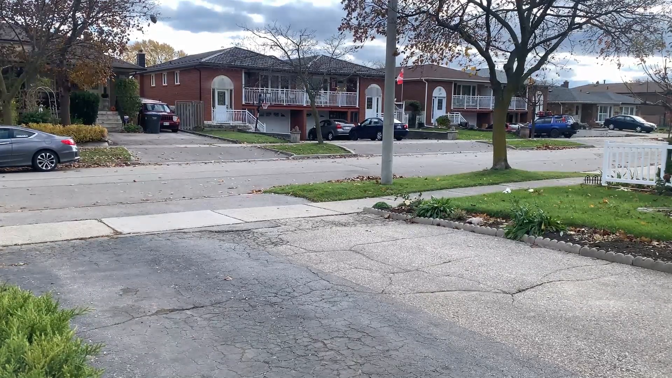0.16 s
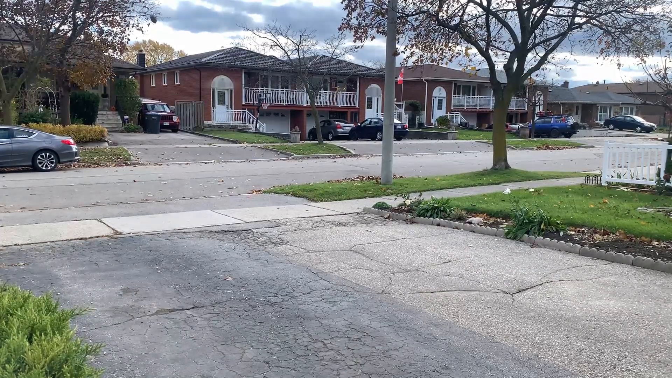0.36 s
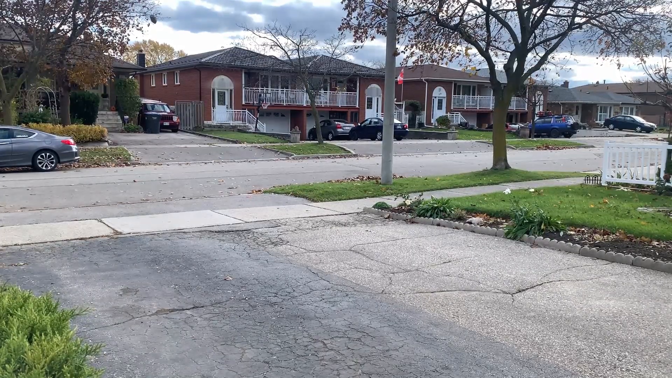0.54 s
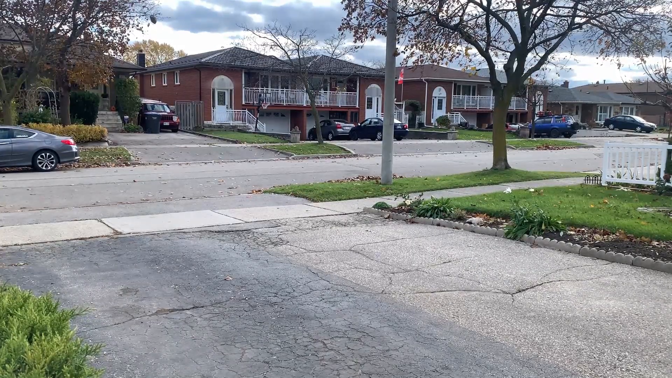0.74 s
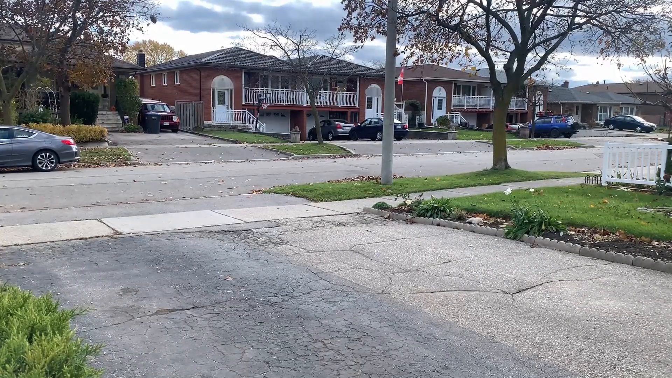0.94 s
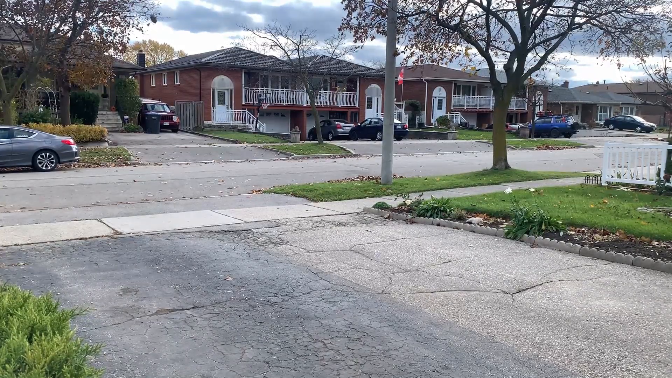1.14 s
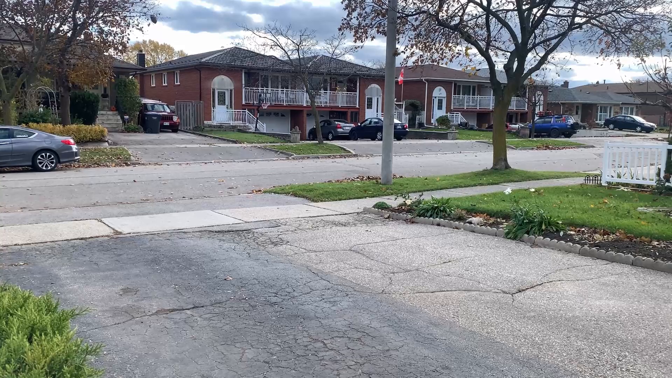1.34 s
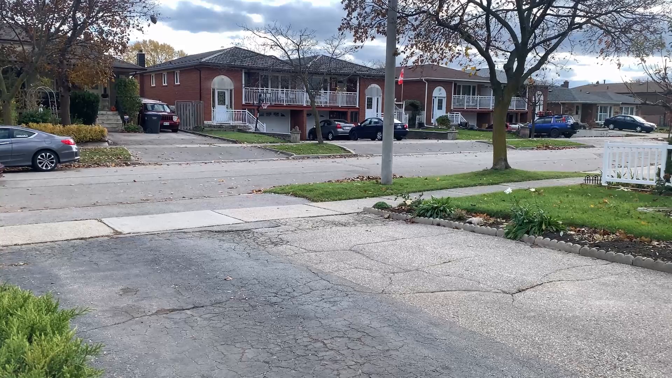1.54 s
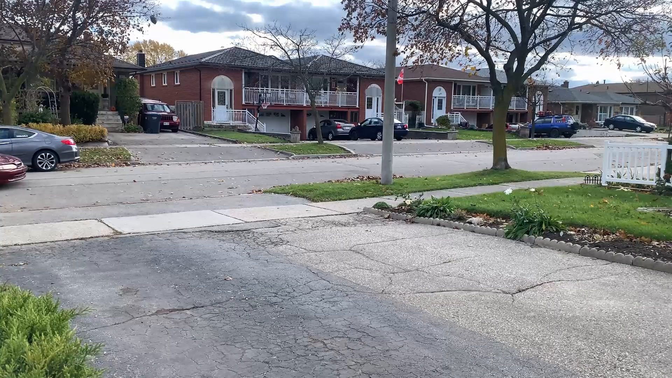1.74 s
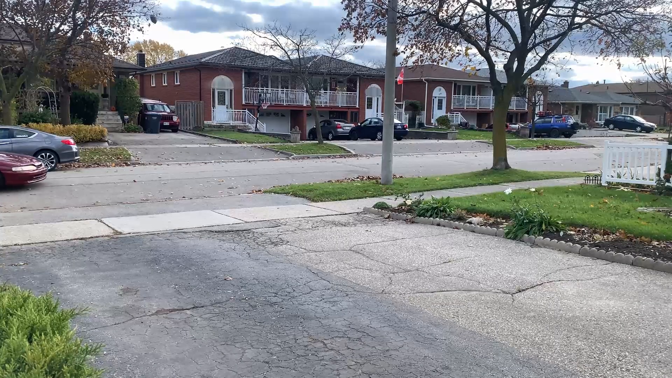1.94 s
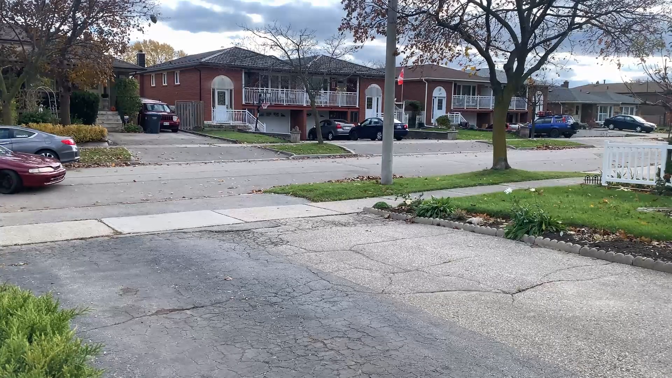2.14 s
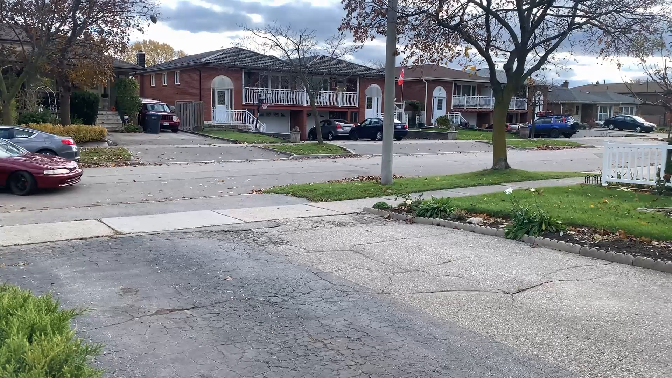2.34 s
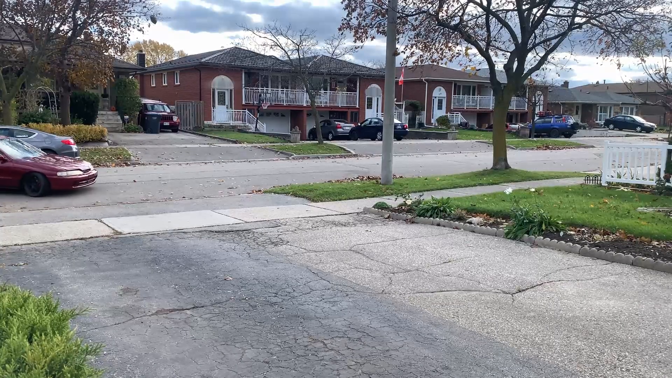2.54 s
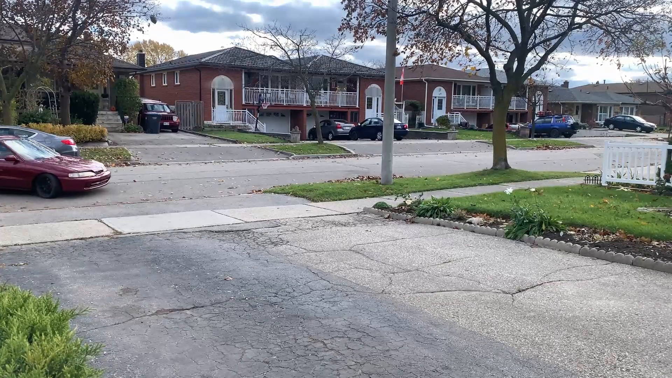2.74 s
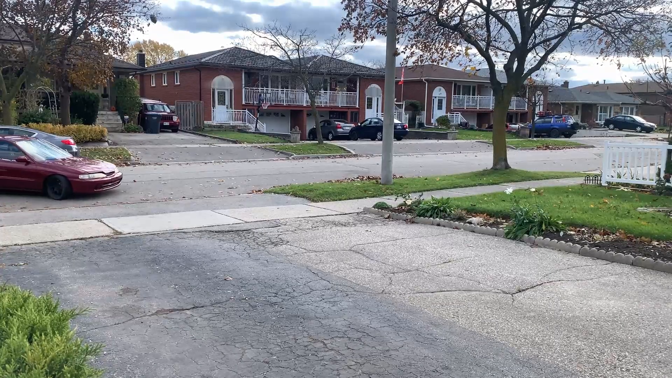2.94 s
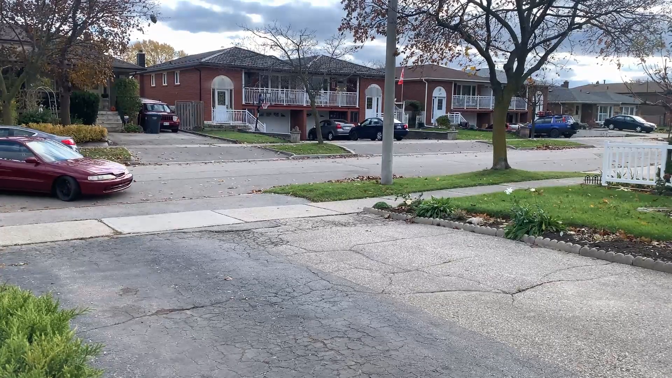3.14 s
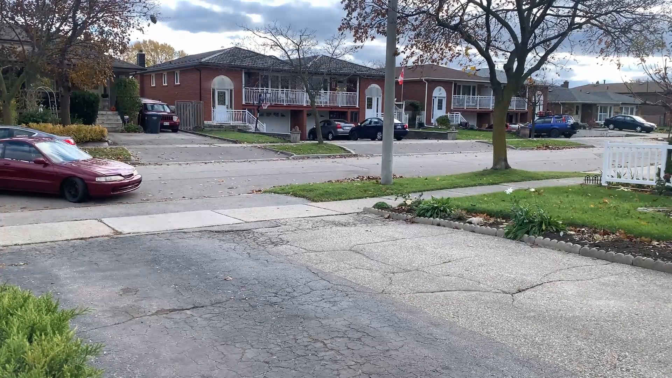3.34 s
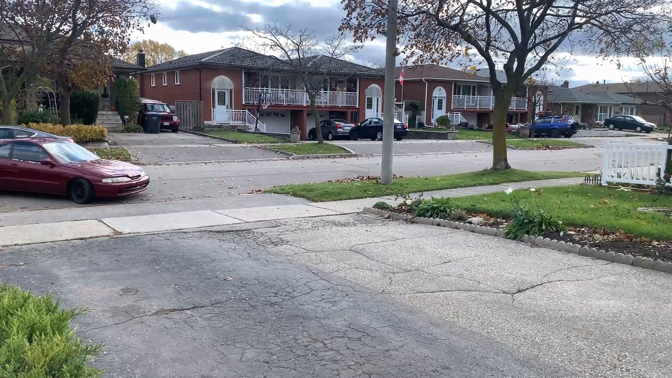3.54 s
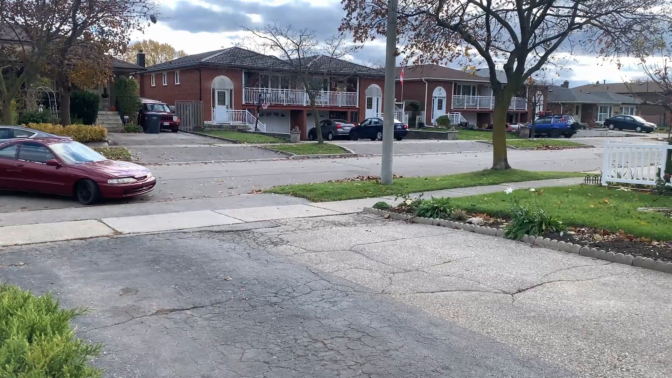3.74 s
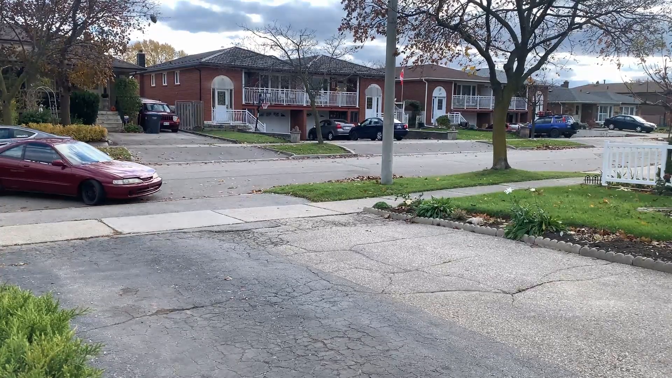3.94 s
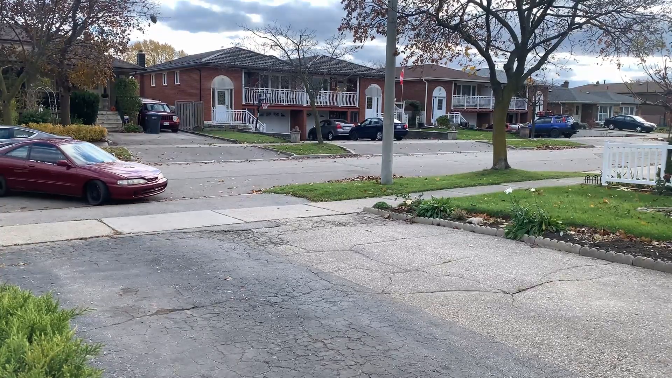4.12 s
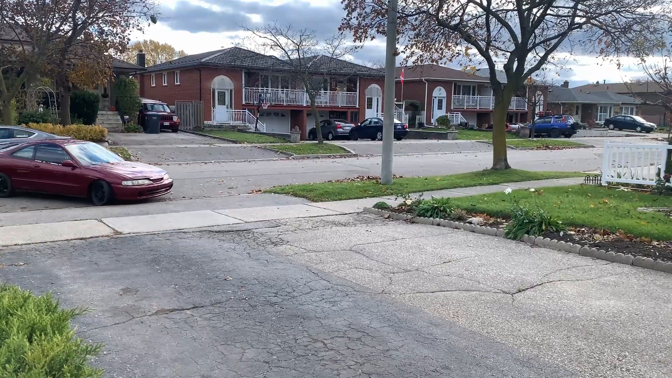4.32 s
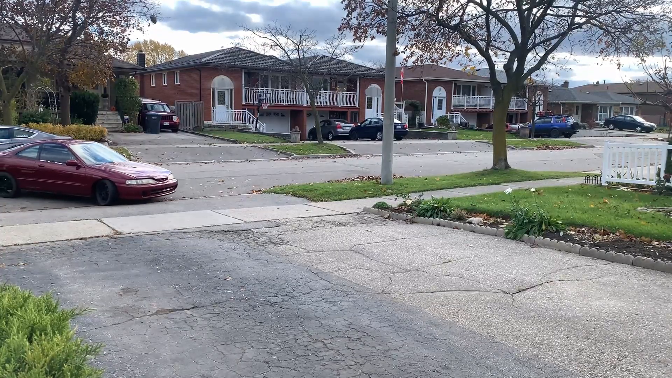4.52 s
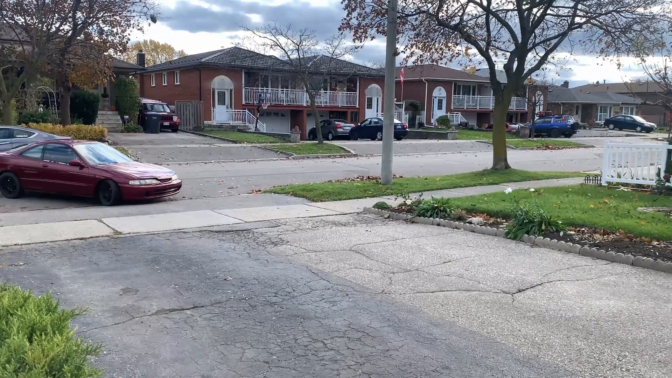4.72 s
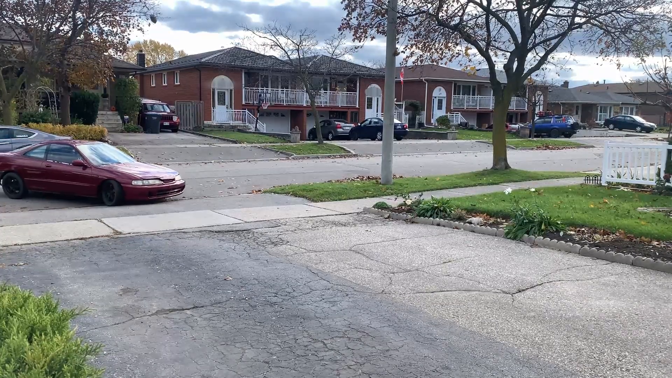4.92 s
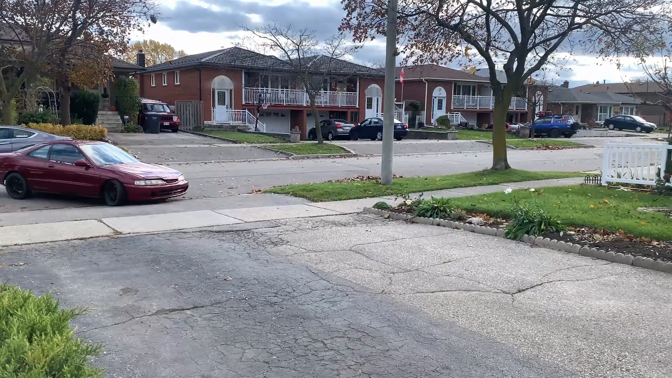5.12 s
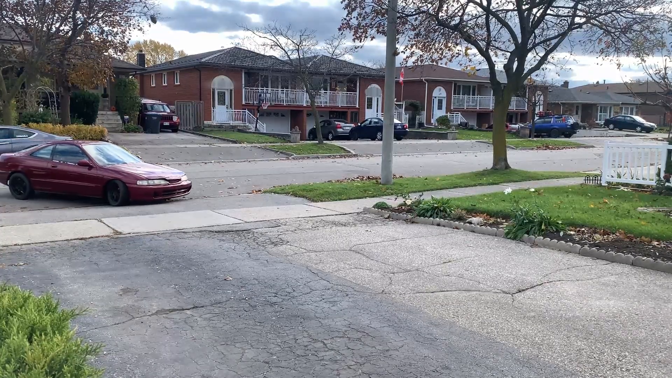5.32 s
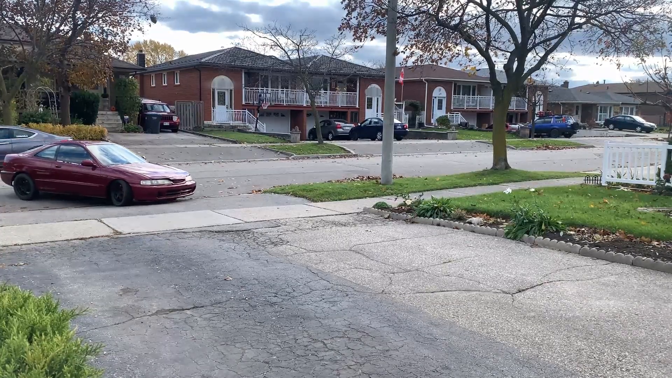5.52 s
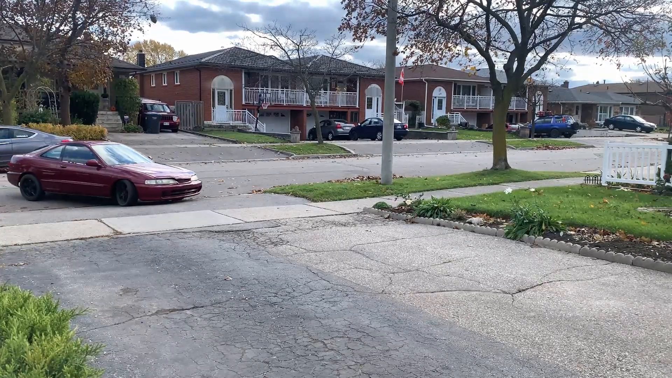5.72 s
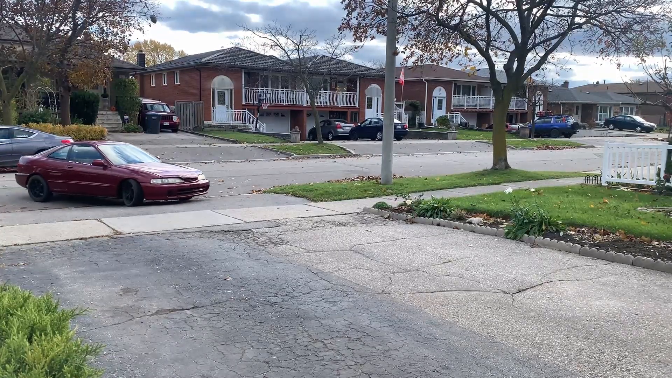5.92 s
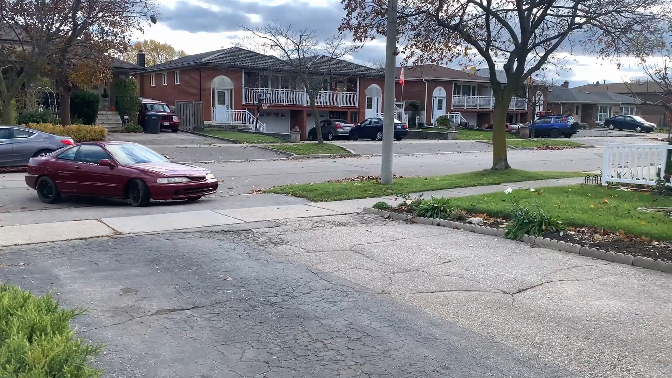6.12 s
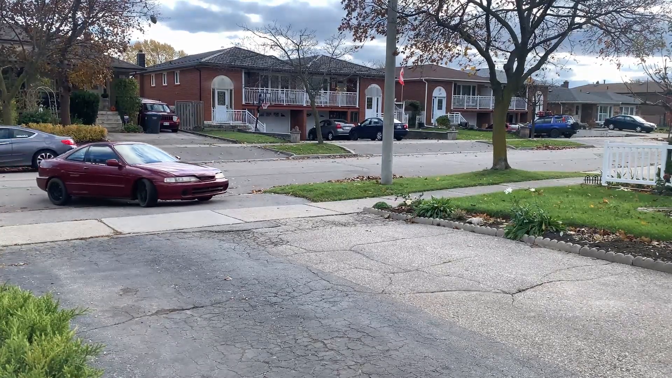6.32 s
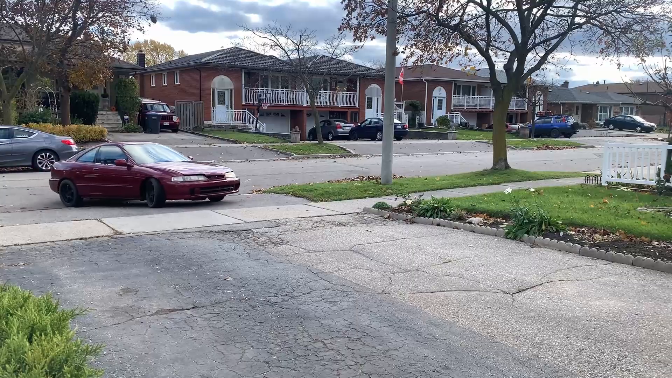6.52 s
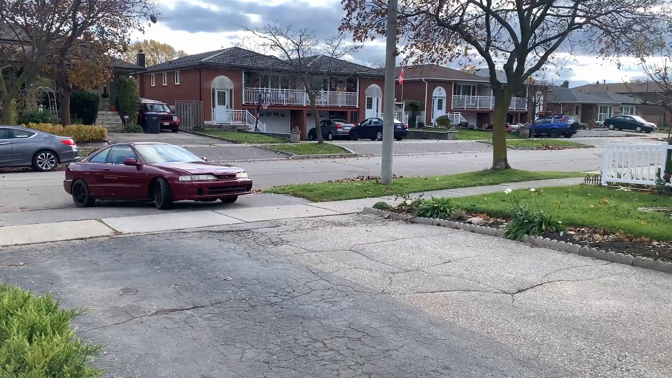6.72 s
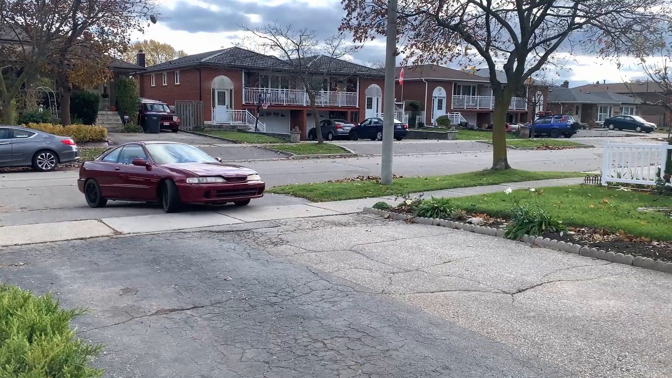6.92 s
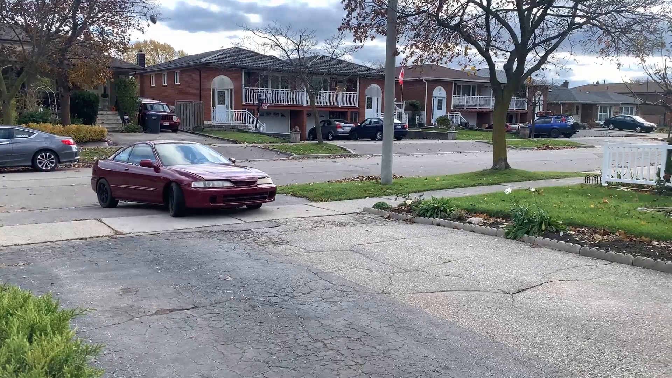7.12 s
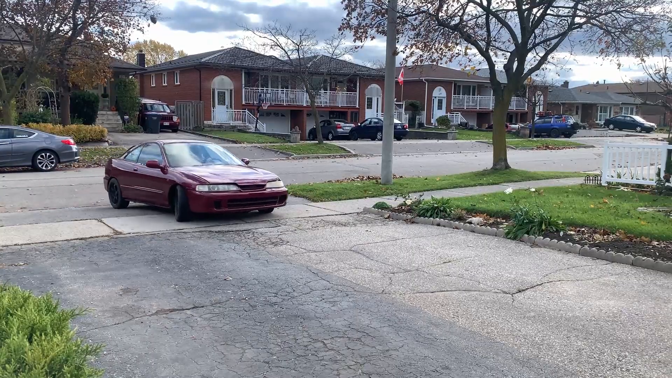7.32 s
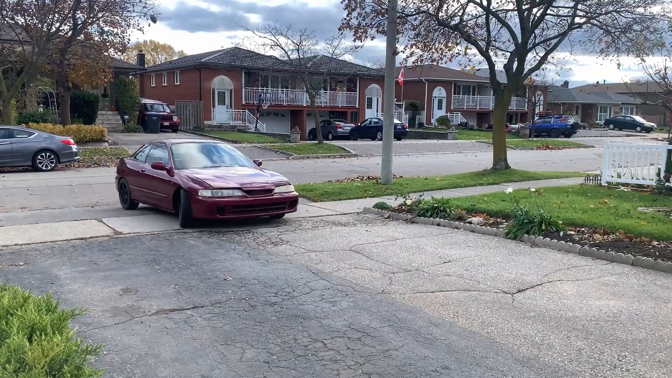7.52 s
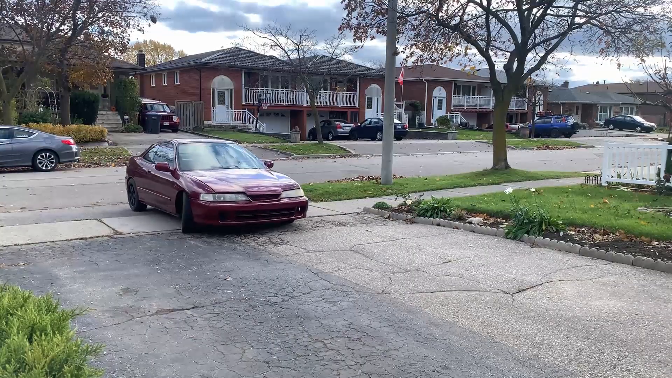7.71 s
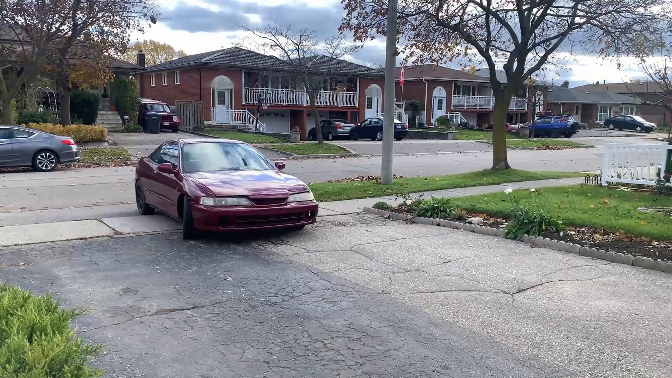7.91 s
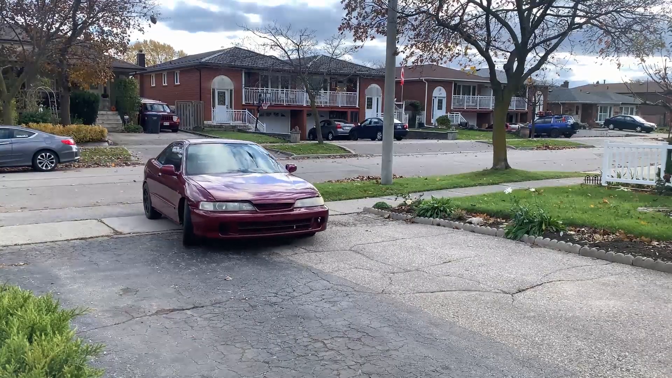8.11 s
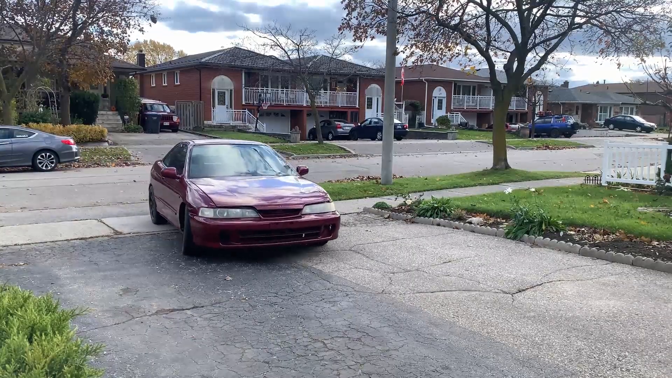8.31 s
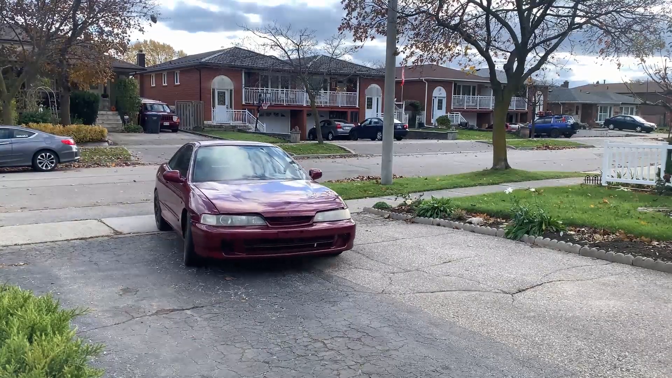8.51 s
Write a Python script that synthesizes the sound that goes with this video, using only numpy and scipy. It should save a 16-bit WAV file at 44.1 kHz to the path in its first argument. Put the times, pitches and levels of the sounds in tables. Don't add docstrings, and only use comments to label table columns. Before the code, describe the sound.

A phone outdoors on a quiet residential street hears a small four-cylinder car with a loud exhaust. From 0 to 1 s a deep, booming drone slides down in pitch and fades, with a barely audible thin brake squeal. From about 1 to 4.4 s it is a much quieter, lumpy idle: soft burble, dry airy brake rubbing, little ticks and scattered dull pops in the pipe, one sharp, loud pop at 3.5 s. At 4.5 s the throttle gulps open with bright hissing bursts and the engine leaps to a high, raspy rev, held with slight wavering until 5.4 s. It falls to a low growl by 6 s, then climbs gently from 6.6 s into a strong, steady boomy drone with rasp and pulsing intake hiss, still sounding at 8.6 s as the car pulls in. House fronts reflect the exhaust; faint street noise lies beneath.

```python
import sys
import numpy as np
from scipy import signal
from scipy.fft import rfft, irfft, next_fast_len
from scipy.io import wavfile
from scipy.ndimage import uniform_filter1d, map_coordinates

SR = 44100
rng = np.random.default_rng(int(sys.argv[2]) if len(sys.argv) > 2 else 0)


def nominal_scale(level):
    x = np.asarray(level, float) / 20
    return 10 ** x


def waveform_to_disk(signal):
    frames = np.transpose(np.atleast_2d(signal))
    scaled = np.clip(frames, -1, 1) * 32767
    samples = np.round(scaled).astype(np.int16)
    wavfile.write(sys.argv[1], SR, samples)


N = 381906

# start_s, crank_turns_per_s, order_1_db, order_2_db (firing), order_3_db, order_4_db, rasp_db
EXHAUST_ORDERS = [(0.03, 51.0, -20, -12, -43, -43, -36), (0.05, 50.6, -21, -11, -41, -50, -37),
                  (0.19, 47.7, -25, -15, -39, -57, -34), (0.27, 46.4, -25, -22, -38, -44, -33),
                  (0.32, 45.7, -27, -10, -52, -41, -34), (0.39, 45.2, -26, -10, -38, -44, -33),
                  (0.44, 45.2, -29, -9, -50, -50, -33), (0.53, 42.9, -41, -7, -43, -42, -44),
                  (0.6, 41.6, -36, -10, -42, -37, -40), (0.7, 40.0, -34, -9, -40, -51, -43),
                  (0.77, 38.6, -36, -9, -39, -39, -45), (0.86, 36.0, -37, -11, -23, -51, -41),
                  (1.01, 32.6, -48, -23, -29, -44, -49), (1.3, 31.3, -46, -27, -31, -47, -45),
                  (1.39, 30.3, -42, -30, -27, -35, -40), (1.51, 29.1, -56, -36, -22, -40, -48),
                  (1.92, 23.6, -61, -44, -35, -39, -47), (2.23, 23.4, -67, -57, -31, -25, -48),
                  (2.3, 23.5, -65, -43, -33, -27, -45), (2.8, 27.1, -61, -36, -24, -38, -45),
                  (3.64, 26.6, -48, -37, -28, -34, -41), (3.79, 26.4, -58, -44, -20, -33, -45),
                  (3.93, 26.7, -52, -31, -26, -40, -46), (4.17, 25.9, -57, -45, -24, -36, -37),
                  (4.36, 23.9, -62, -33, -23, -21, -42), (4.41, 23.5, -62, -57, -30, -24, -43),
                  (4.46, 23.6, -53, -40, -25, -16, -40), (4.53, 26.7, -41, -29, -10, -20, -35),
                  (4.58, 30.9, -38, -15, -10, -21, -28), (4.62, 37.3, -31, -10, -27, -51, -22),
                  (4.65, 42.2, -30, -7, -27, -34, -23), (4.69, 51.0, -23, -8, -36, -32, -18),
                  (4.72, 54.5, -18, -13, -38, -28, -18), (4.74, 57.5, -16, -15, -29, -29, -20),
                  (4.79, 62.1, -15, -19, -36, -29, -17), (4.84, 64.6, -19, -35, -34, -40, -21),
                  (4.86, 65.8, -17, -38, -42, -45, -31), (4.93, 63.2, -13, -23, -39, -40, -24),
                  (5.01, 60.4, -20, -26, -39, -37, -29), (5.05, 60.1, -15, -26, -48, -36, -26),
                  (5.13, 62.2, -15, -22, -31, -31, -17), (5.2, 64.0, -18, -24, -43, -34, -24),
                  (5.27, 66.0, -15, -27, -29, -37, -22), (5.36, 68.1, -12, -28, -21, -31, -22),
                  (5.43, 65.6, -13, -25, -25, -32, -22), (5.53, 60.5, -21, -18, -29, -29, -16),
                  (5.58, 57.2, -16, -15, -31, -30, -25), (5.63, 53.7, -18, -12, -51, -28, -20),
                  (5.68, 50.3, -26, -10, -34, -45, -21), (5.75, 46.0, -27, -8, -30, -39, -27),
                  (5.92, 39.1, -35, -12, -35, -35, -31), (6.01, 35.7, -38, -10, -18, -34, -28),
                  (6.2, 34.4, -37, -14, -11, -40, -33), (6.32, 33.6, -38, -15, -11, -35, -32),
                  (6.49, 34.1, -38, -16, -11, -34, -34), (6.61, 36.4, -32, -11, -13, -29, -28),
                  (6.68, 38.1, -37, -8, -36, -32, -25), (6.77, 39.4, -32, -9, -28, -28, -27),
                  (6.94, 41.0, -33, -8, -32, -32, -27), (7.02, 41.7, -32, -10, -33, -53, -21),
                  (7.09, 42.1, -29, -10, -29, -31, -21), (7.14, 42.3, -28, -10, -28, -31, -17),
                  (7.35, 43.4, -31, -10, -30, -30, -18), (7.52, 44.2, -30, -8, -28, -53, -20),
                  (7.61, 44.5, -28, -9, -30, -39, -16), (7.66, 44.8, -30, -9, -30, -49, -19),
                  (7.9, 45.6, -34, -8, -26, -37, -23), (8.02, 44.5, -35, -8, -25, -54, -22),
                  (8.26, 44.6, -32, -7, -29, -39, -25), (8.38, 44.7, -31, -7, -27, -56, -21),
                  (8.4, 44.6, -34, -7, -27, -42, -24), (8.62, 44.7, -33, -7, -26, -45, -23)]
# start_s, roar_db, treble_db
BAY_LEVELS = [(0.03, -52, -56.5), (1.03, -58, -70), (1.08, -61, -53), (1.11, -58, -67.5),
              (1.15, -60.5, -66), (1.27, -55.5, -58.5), (1.68, -56, -56), (1.75, -55, -60),
              (1.99, -55, -58), (2.2, -52, -52), (3.16, -56.5, -64.5), (3.19, -53.5, -64),
              (3.21, -57, -58.5), (3.47, -56, -66), (3.5, -55, -69), (3.59, -55, -69), (3.62, -47, -61),
              (3.67, -58, -68.5), (4.12, -58, -72), (4.14, -60, -72), (4.17, -59, -68), (4.41, -56, -63.5),
              (4.43, -56.5, -66.5), (4.46, -51.5, -48.5), (4.58, -42, -34), (4.6, -32.5, -30.5),
              (4.69, -35.5, -34.5), (4.72, -33, -37), (4.74, -37, -39), (4.84, -40, -55.5),
              (4.91, -42.5, -62), (4.93, -44.5, -47.5), (4.98, -42.5, -55.5), (5.05, -45.5, -58),
              (5.25, -40.5, -51.5), (5.56, -42, -48), (5.72, -43.5, -50.5), (5.96, -43, -47),
              (5.98, -38, -46), (6.01, -45.5, -46), (6.08, -41, -44), (6.27, -40, -42.5),
              (6.65, -35, -37.5), (6.82, -35.5, -41), (7.04, -36, -43), (7.49, -40.5, -47),
              (7.93, -40, -50), (8.6, -38, -48.5), (8.62, -34, -49.5)]
# start_s, rough_share of rasp, hiss_pulse_depth, brake_share of treble
SHARES = [(0, .3, .2, 0), (.5, .4, .2, 0), (1.1, .85, .2, .1), (1.3, .9, .1, .8), (3.3, .9, .1, .8),
          (4.3, .9, .2, .5), (4.45, .8, .3, 0), (4.75, .4, .4, 0), (4.95, .4, .3, 0), (5.3, .15, .3, .15),
          (5.7, .35, .3, .15), (6, .6, .5, 0), (6.7, .6, .65, 0), (7, .2, .55, 0), (7.5, .1, .4, 0),
          (8.66, .1, .35, 0)]


def unit(x):
    return x / np.sqrt(np.mean(x ** 2) + 1e-20)


def along(points, hz):
    f, v = np.transpose(points)
    return np.interp(np.log(hz + 1), np.log(f + 1), v)


def curves(rows):
    s, *cols = np.transpose(rows)
    return [np.interp(np.arange(N) / SR, s, c) for c in cols]


def wobble(rate_hz):
    knots = rng.standard_normal(int(N * rate_hz / SR) + 4)
    return map_coordinates(knots, [np.arange(N) * rate_hz / SR], order=2)


def filtered(x, response):
    edge = 2048
    x = np.pad(x, [(0, 0)] * (x.ndim - 1) + [(edge, edge)], "reflect", reflect_type="odd")
    m = next_fast_len(N + SR // 2)
    spectrum = rfft(x, m) * response(np.fft.rfftfreq(m, 1 / SR))
    return irfft(spectrum, m)[..., edge:edge + N]


def ringing(modes, hz):
    total = 0
    for k, (centre_hz, width_hz, db) in enumerate(modes):
        damping = 1j * hz * width_hz
        total = total + (-1) ** k * nominal_scale(db) * damping / (centre_hz ** 2 - hz ** 2 + damping)
    return total


def rush(spectrum, patchy_db, modes=()):
    z = signal.stft(rng.standard_normal((2, N)), nperseg=512)[2]
    patches = uniform_filter1d(rng.standard_normal(z.shape[1:]), 5, 0)
    patches = unit(uniform_filter1d(patches, 8, 1))
    pair = signal.istft(z * nominal_scale(patchy_db * patches), nperseg=512)[1][:, :N]
    return unit(filtered(pair, lambda hz: np.hypot(nominal_scale(along(spectrum, hz)), np.abs(ringing(modes, hz)))))


def crank():
    return np.cumsum(curves(EXHAUST_ORDERS)[0]) / SR


def firings():
    at = np.flatnonzero(np.diff(np.floor(2 * crank())))
    train = np.zeros(N)
    train[at] = rng.uniform(-1.01, 1, N)[at]
    return train


def boom():
    # centre_hz, width_hz, level_db
    muffler = [(88.1, 47.2, 8), (52, 28, -2.5), (119, 50, -8)]
    # start_s, level_db
    burble_levels = [(0, -33.5), (.5, -33.5), (.8, -28), (1.1, -29), (1.6, -30.5), (2, -31.5), (2.6, -30),
                     (3.2, -26), (3.8, -28.5), (4.3, -25), (4.55, -15), (4.75, -18), (4.95, -21.5),
                     (5.3, -28.5), (5.7, -27), (6, -25), (6.5, -25), (6.7, -24.5), (7, -30), (7.5, -31.5),
                     (8.66, -31.5)]
    turns = crank()
    tones = np.zeros(N)
    for order, db in enumerate(curves(EXHAUST_ORDERS)[1:5], 1):
        level = nominal_scale(db + .7 * wobble(14)) * np.sqrt(2)
        tones += level * np.sin(2 * np.pi * order * turns + .12 * wobble(9))
    burble = filtered(firings(), lambda hz: ringing(muffler, hz) ** 2)
    return tones + nominal_scale(curves(burble_levels)[0]) * unit(burble)


def rasp():
    # order, level_db
    upper_orders = [(3.5, -20.5), (4.5, -19.5), (5, -0.5), (5.5, -20.5), (6, 0), (6.5, -14.5), (7, 1),
                    (7.5, -15), (8, -1.5), (8.5, -23), (9, 0.5), (10, -1.5), (11, -5.5), (12, -8),
                    (13, -4.5)]
    # freq_hz, gain_db
    pipe_gain = [(88, -38), (150, -8), (172, -11.5), (204, -10.5), (237, -17), (306, 3), (339, -13.5),
                 (398, -9), (426, -23), (554, -17.5), (655, -40), (750, -30.5), (980, -64), (1650, -120)]
    # freq_hz, level_db
    puff_spectrum = [(60, -41.5), (140, -11), (200, -3.5), (300, 0.5), (420, -9.5), (560, -10.5),
                     (700, -27), (1200, -60)]
    speed_hz, *_, rasp_db = curves(EXHAUST_ORDERS)
    rough = curves(SHARES)[0]
    turns, tones, power = crank(), np.zeros(N), 1e-12
    for multiple, db in upper_orders:
        order = round(2 * multiple) / 2
        size = nominal_scale(db + along(pipe_gain, order * speed_hz))
        tones += size * nominal_scale(2 * wobble(6)) * np.sin(2 * np.pi * order * turns + .5 * wobble(8))
        power = power + size ** 2 / 2
    puffs = np.exp(-2.5 * (2 * turns % 1)) * nominal_scale(2.7 * wobble(25)) * rng.standard_normal(N)
    puffs = unit(filtered(puffs, lambda hz: nominal_scale(along(puff_spectrum, hz))))
    mix = np.sqrt(1 - rough) * tones / np.sqrt(power) + np.sqrt(rough) * puffs
    return nominal_scale(rasp_db - 0.74) * mix


def pops():
    # start_s, peak_db, pitch_hz
    pop_events = [(0.566, -24.5, 232), (1.132, -31, 230), (1.262, -33.5, 229), (1.338, -24, 230),
                  (1.352, -33.5, 228), (1.39, -40, 228), (1.598, -33, 230), (1.738, -31, 231),
                  (1.843, -32, 229), (2.06, -29, 230), (2.074, -32, 230), (2.31, -42, 228),
                  (2.42, -32.5, 230), (2.632, -26.5, 236), (2.818, -35, 230), (3.108, -27.5, 228),
                  (3.171, -27.5, 230.1), (3.499, -15.5, 230.1), (3.565, -28, 229), (3.901, -34, 230),
                  (4.009, -29, 227), (4.102, -32.5, 229), (4.136, -24.5, 230), (4.17, -33, 232),
                  (4.249, -27.5, 232), (4.326, -29.5, 230), (4.412, -34.5, 232)]
    out, t = np.zeros(N + SR), np.arange(SR // 8) / SR
    low = signal.butter(4, 700 / SR * 2, output="sos")
    soft_edge = 1 - np.exp(-t / .003)
    for s, db, hz in pop_events:
        thud = nominal_scale(-60 * t / .05) * np.sin(2 * np.pi * hz * t * (1 + .5 * np.exp(-t / .006)))
        puff = 1.2 * nominal_scale(-60 * t / .06) * signal.sosfilt(low, rng.standard_normal(len(t)))
        out[round(s * SR):][:len(t)] += nominal_scale(db + 6.5) * (thud + puff) * soft_edge
    return out[:N]


def bay():
    # freq_hz, level_db
    roar_spectrum = [(300, -22.5), (500, -7.5), (700, -19.5), (1300, -17.5), (2300, -19), (2600, -19),
                     (4500, -29.5), (6000, -52), (9000, -100)]
    # freq_hz, level_db
    hiss_spectrum = [(1200, -30), (2500, -4.5), (4000, -4), (6000, -5.5), (8500, -8), (11000, -8.5),
                     (13000, -9), (15200, -4), (16200, -15), (17000, -73.5)]
    # centre_hz, width_hz, level_db
    panels = [(563, 32, -4.5), (763, 35, -3), (996, 89, -7), (1241, 24, -4), (1440, 28, -10.5),
              (1677, 49, -12), (1940, 76, -13.5), (2263, 37, -12), (3320, 150, -19.5)]
    roar_db, treble_db = curves(BAY_LEVELS)
    _, depth, braking = curves(SHARES)
    beat = np.exp(-2.2 * ((crank() + .3) % 1)) * nominal_scale(1.98 * wobble(20))
    beat = uniform_filter1d(beat, 60) / np.mean(beat)
    hiss = unit((1 - depth + depth * beat) * rush(hiss_spectrum, patchy_db=2.5))
    roar = rush(roar_spectrum, patchy_db=1.5, modes=panels)
    roar = unit((1 - .4 * depth + 0.33 * depth * beat) * roar)
    return nominal_scale(treble_db + 4.0) * np.sqrt(1 - braking) * hiss + nominal_scale(roar_db + 3.0) * roar


def ticks():
    # start_s, peak_db, t60_s, tilt_db_per_octave
    tick_events = [(1.065, -28, 0.13, 0.5), (2.5182, -41.5, 0.11, 2), (3.2344, -47, 0.17, -7),
                   (3.4304, -48.5, 0.15, -5.5), (3.6075, -44, 0.15, -7), (4.0078, -46, 0.2, -9),
                   (4.049, -49.5, 0.15, -2.5), (4.1354, -46, 0.15, -7.5), (4.4034, -47.5, 0.15, -4),
                   (4.4538, -38, 0.15, -4.5), (4.4947, -27.5, 0.15, 1), (4.5316, -20, 0.15, 0),
                   (4.5935, -15, 0.15, -1), (4.9244, -28, 0.15, -4.5), (7.0179, -28, 0.15, -6)]
    out, t = np.zeros((2, N + SR)), np.arange(SR // 4) / SR
    hz = np.fft.rfftfreq(len(t), 1 / SR)
    for s, db, t60_s, tilt_db in tick_events:
        colour = nominal_scale(tilt_db * np.log2(hz / 4000 + .01)) * (hz > 700)
        burst = unit(irfft(rfft(rng.standard_normal((2, len(t)))) * colour, len(t)))
        out[:, round(s * SR):][:, :len(t)] += nominal_scale(db - 10 - 60 * t / t60_s) * burst
    return out[:, :N]


def brakes():
    # centre_hz, width_hz, level_db
    discs = [(3420, 90, -5), (3800, 200, 4), (4600, 120, 4), (4790, 60, -3.5), (6750, 260, -12),
             (10000, 250, -5), (12400, 270, -13), (15300, 380, -5.5)]
    # start_s, pitch_hz, level_db
    squeal_track = [
        (0.35, 11038, -89),
        (0.458, 10982, -81.5),
        (0.912, 11023, -80.5),
        (1.0, 10929, -89),
    ]
    hz, db = curves(squeal_track)
    t = np.arange(N) / SR
    sounding = (t > squeal_track[0][0]) * (t < squeal_track[-1][0])
    squeal = nominal_scale(db + 6) * sounding * np.sin(2 * np.pi * np.cumsum(hz) / SR)
    rub_db = curves(BAY_LEVELS)[1] + 3 + 1.5 * wobble(8)
    rub_spectrum = [(1500, -60.5), (3000, -19), (16000, -24.5)]  # freq_hz, level_db
    rub = rush(rub_spectrum, patchy_db=2, modes=discs)
    rub = np.sqrt(curves(SHARES)[2]) * nominal_scale(rub_db) * rub
    return rub + squeal * [[1], [0]]


def houses(x):
    # freq_hz, t60_s
    decay = [(60, 0.33), (400, .45), (3000, .3), (12000, .2)]
    hz, t, z = signal.stft(rng.standard_normal(SR // 2), SR, nperseg=1024)
    tail = signal.istft(z * nominal_scale(-60 * t / along(decay, hz)[:, None]), SR, nperseg=1024)[1]
    return signal.fftconvolve(np.pad(x, (900, 0)), tail / np.linalg.norm(tail))[:N]


def street():
    # freq_hz, level_db
    street_spectrum = [(20, -51), (60, -53.5), (300, -59.5), (1000, -72), (4000, -66), (7000, -74),
                       (10000, -100.5), (16000, -96)]
    return nominal_scale(-58.5) * rush(street_spectrum, patchy_db=3.0)


def scene():
    bang = pops()
    pipe = boom() + rasp() + bang + nominal_scale(-13) * houses(bang)
    car = np.array([pipe, houses(pipe)]) + bay() + ticks() + brakes()
    return car + street()


def roll_off(x):
    return signal.sosfilt(signal.butter(12, 17090, fs=SR, output="sos"), x)


def record(dry):
    # freq_hz, likeness (0-1)
    alike = [(30, 1), (100, 1), (300, 0.95), (700, 0.69), (1500, 0.69), (3000, 0.34), (5000, 0.19),
             (7000, 0.67), (8600, 0.99), (16000, 0.87)]
    # freq_hz, phase_rad
    port_lead = [(0, 0), (600, .7), (1640, 1.5), (2330, 1.6), (4050, 5.4), (5430, 3.8), (7150, -1.4),
                 (8600, -np.pi), (13500, -3 * np.pi), (17000, -13.9)]

    def share(hz):
        turn_rad = np.arccos(np.clip(along(alike, hz), -1, 1)) / 2
        return np.array([np.cos(turn_rad), np.sin(turn_rad)])

    def spacing(hz):
        lead_rad = np.interp(hz, *np.transpose(port_lead))
        return np.exp(.5j * lead_rad * np.array([[1], [-1]])) * (hz < 16050)

    mid, side = filtered(dry, share)
    ports = np.array([mid + side, mid - side])
    ports = ports / (1 + np.abs(ports / 1.05) ** 6) ** (1 / 6)
    return roll_off(filtered(ports, spacing))


dry = scene()
out = record(dry)
waveform_to_disk(out)
```